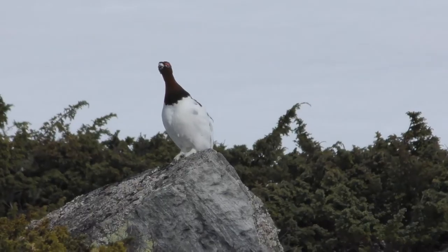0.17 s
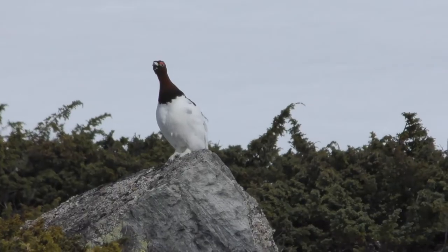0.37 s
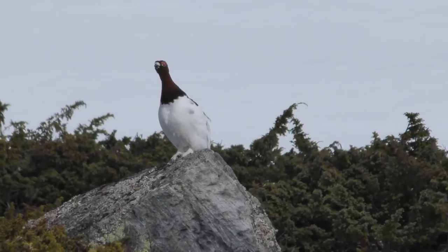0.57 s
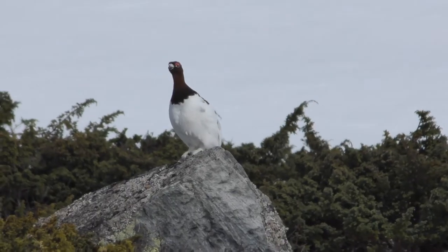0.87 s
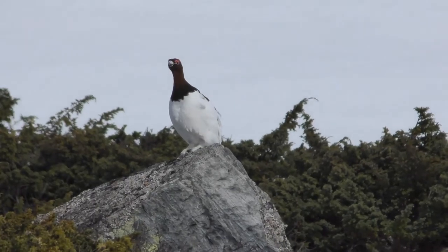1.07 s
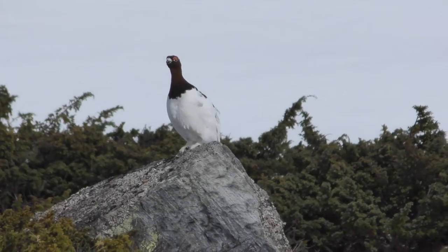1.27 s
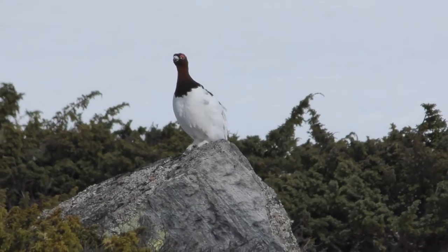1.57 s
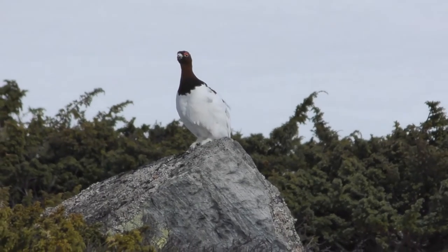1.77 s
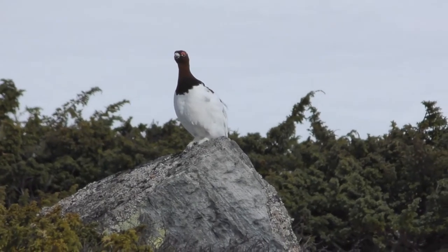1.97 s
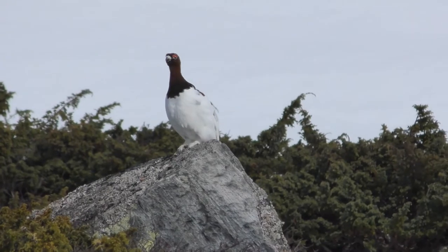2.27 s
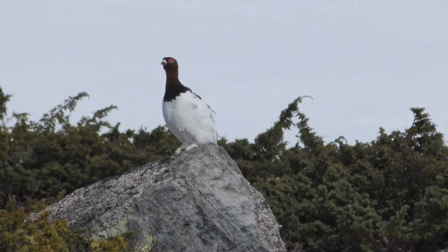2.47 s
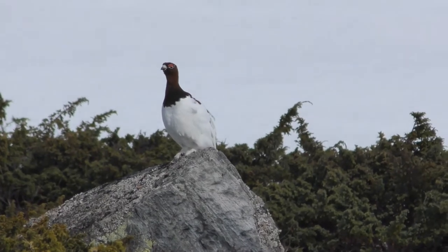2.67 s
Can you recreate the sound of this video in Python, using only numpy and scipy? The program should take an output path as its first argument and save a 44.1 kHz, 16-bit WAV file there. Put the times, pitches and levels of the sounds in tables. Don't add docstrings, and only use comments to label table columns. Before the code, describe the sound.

A grouse ends its rattle from the start to about 0.8 s: thirteen short, dry, nasal croaks, roughly fifteen per second, each a burst of throat clicks, becoming slower, softer and duller, with a short scattered echo. Beneath runs a steady far engine drone in low rumble, soft wind in bushes, faint hiss and barely audible high whine. A tiny plastic tick comes at 1.2 s; only background remains.

```python
import sys
import numpy as np
from scipy import signal
from scipy.fft import rfft, irfft
from scipy.io import wavfile
from scipy.ndimage import uniform_filter1d

SR = 44100
rng = np.random.default_rng(int(sys.argv[2]) if len(sys.argv) > 2 else 0)


def to_wav(s):
    ch = np.atleast_2d(s).T
    pcm = np.round(np.clip(ch, -1, 1) * 32767)
    wavfile.write(sys.argv[1], SR, pcm.astype(np.int16))


def boost_factor(decibels):
    exponent = np.asarray(decibels, float) / 20
    return 10 ** exponent


N = 123921

# f/Hz, likeness/0-1, left minus right/dB, left lead/rad
PORT_SPREAD = [(30, .98, 0, -0.59), (150, 0.93, -1.3, -0.27), (307, 0.94, -1.6, -0.68),
               (590, 0.55, -5.5, -0.51), (1230, 0.76, -6, -0.11), (2620, 0.32, -4, .3),
               (4500, 0.56, -1.5, 0.44), (7000, 0.85, 0.5, -0.072), (15000, 0.6, -0.5, 0)]
# multiple of the cycle/1, rms level/dB
ENGINE_HARMONICS = [(1, -48), (2, -41), (3, -42.5), (4, -56.5), (5, -44.5), (6, -61), (7, -56.5),
                    (8, -46.5), (9, -47.5), (11, -59.5), (12, -57)]
# f/Hz, density/dB per Hz
RUMBLE_COLOUR = [(12, -26), (44, -22), (70, -7), (110, -5), (160, -1), (250, -6.5), (370, -8), (450, -21.5)]
# f/Hz, density/dB per Hz
WIND_COLOUR = [(430, -2), (580, -3.5), (1040, -8), (1370, -5.5), (2390, -18), (3200, -17.5), (3700, -22.5),
               (7000, -37)]
# f/Hz, density/dB per Hz
HISS_COLOUR = [(5000, -21.5), (7700, -3), (10000, 2), (13400, 1.5), (16000, -1.5)]
# t/s, level/dB, first gap/ms, pulse period/ms, beak brightness/dB
CROAKS = [(0.0373, -28.5, 5.1, 3.74, 1), (0.1146, -29, 4.6, 3.88, 0), (.1820, -27, 4.8, 4.0, -0.5),
          (0.2442, -27.5, 5, 4.35, -6.5), (0.3062, -30, 4.6, 4.9, -5.5), (0.359, -32.5, 5.4, 4.7, -2),
          (0.4147, -31, 5.6, 4.95, -3), (0.4735, -31, 5.8, 7.1, -8), (.5222, -33, 6.2, 5.6, -13),
          (0.5759, -32.5, 7.1, 5.1, -6), (.6330, -35, 5.8, 6.1, -1), (.6920, -34.5, 7.1, 5.6, -0.5),
          (0.7686, -37.5, 6.1, 7.0, -16)]
# t/s, level/dB
LEAD_INS = [
    (0.1111, -38),
    (0.3023, -43),
    (0.353, -43),
    (0.4679, -39),
    (0.5651, -45),
    (0.7612, -43),
]
# f/Hz, level/dB, t60/ms
WINDPIPE_MODES = [(1296, -11, 13), (1800, -12, 22), (2126, 4, 13.9), (2591, -3, 18.7), (3350, -16.5, 7.9)]
# f/Hz, level/dB, t60/ms
OPENING_BEAK_MODES = [(3950, -12.5, 6.1), (5650, -18, 9.5), (8470, -18.5, 9.3), (10800, -20, 6)]
# f/Hz, level/dB, t60/ms
OPEN_BEAK_MODES = [(4130, -12.5, 8.8), (6160, -14, 8.5), (8750, -26, 8), (9630, -14.5, 8.5),
                   (10400, -32, 6), (11260, -17, 10.6), (12300, -33, 5.4), (13500, -32, 5)]
# t/s, level/dB, f/Hz, t60/ms, pan/dB
TICKS = [
    (1.2078, -44, 9730, 8, 2),
]

ENGINE_HZ, ENGINE_WANDER_DB, THROB_DB = 27.67, 0.4, 0.8
RUMBLE_DB, WIND_DB, HISS_DB = -35, -46.5, -67.5
WHINE_HZ, WHINE_DB = 15650, -88
CROAK_LENGTH_MS, FAST_PERIOD_MS, LENGTH_POWER = 38, 3.65, 1.6
FADE_DB, FADE_START, SLOWING = 17, 0.17, 0.25
FIRST_PITCH_DROP, FIRST_PULSE_DB = 0.027, -1.5
SAG_PER_S, SAG_PER_DB = 0.05, 0.002
DULLING_DB_PER_DB, LEAD_IN_BEAK_DB = 1.6, -10
BEAK_TOP_HZ = 9500
PUSH_MS = 0.32
PUFF_DB, PUFF_T60_MS = -29, 12
SCATTER_DB, SCATTER_PITCH = 0.7, 0.006
BIRD_PAN_DB, SCRUB_ECHO_DB, SCRUB_T60_S = -1.5, -10.5, 0.076


def read(table, hz, column=1):
    table = np.array(table, float)
    return np.interp(np.log(np.maximum(hz, 1)), np.log(table[:, 0]), table[:, column])


def walk(rate_hz):
    hold = int(SR / rate_hz)
    steps = np.repeat(rng.standard_normal(N // hold + 2), hold)
    smooth = uniform_filter1d(uniform_filter1d(steps, hold), hold)[:N]
    return smooth / smooth.std()


def ports(spectra, hz):
    tilt = boost_factor(read(PORT_SPREAD, hz, column=2) / 2)
    left = tilt * np.exp(0.5j * read(PORT_SPREAD, hz, column=3))
    return spectra * np.array([left, 1 / left])


def coloured_noise(colour, rms_db, slope_db_per_octave):
    hz = np.arange(N // 2 + 1) * SR / N
    low_hz, high_hz = colour[0][0], colour[-1][0]
    octaves_outside = np.log2(np.maximum(low_hz / np.maximum(hz, 1), 1) * np.maximum(hz / high_hz, 1))
    likeness = np.clip(read(PORT_SPREAD, hz), 0, 1)
    mid, side = rfft(rng.standard_normal((2, N)))
    pair = np.sqrt(1 + likeness) * mid + np.sqrt(1 - likeness) * side * np.array([[1], [-1]])
    gain = boost_factor(read(colour, hz) - slope_db_per_octave * octaves_outside)
    noise = irfft(ports(pair * gain, hz), N)
    return noise * boost_factor(rms_db) / noise.std()


def engine_drone():
    t_s, out = np.arange(N) / SR, 0
    starts = rng.uniform(0, 2 * np.pi, len(ENGINE_HARMONICS))
    for (multiple, db), start in zip(ENGINE_HARMONICS, starts):
        hz = ENGINE_HZ * multiple
        level_db = db + ENGINE_WANDER_DB * np.sqrt(multiple) * walk(5)
        tone = np.exp(1j * (2 * np.pi * hz * t_s + start)) * boost_factor(level_db)
        out = out + np.sqrt(2) * ports(tone, np.full(1, hz)).real
    return out


def throb_db():
    return THROB_DB * np.sin(2 * np.pi * ENGINE_HZ * np.arange(N) / SR)


def low_rumble():
    return coloured_noise(RUMBLE_COLOUR, RUMBLE_DB, 32) * boost_factor(0.5 * walk(1.17) + throb_db())


def scrub_wind():
    gusts_db = 0.15 * walk(3.6) + 0.5 * walk(12)
    return coloured_noise(WIND_COLOUR, WIND_DB, 24) * boost_factor(gusts_db + throb_db())


def camera_hiss():
    return coloured_noise(HISS_COLOUR, HISS_DB, 12)


def camera_whine():
    return boost_factor(WHINE_DB) * np.sin(2 * np.pi * WHINE_HZ * np.arange(N) / SR)


def ring_modes(track, t0_s, modes, db, scale):
    i = int(t0_s * SR) + 1
    t_ms = (np.arange(i, i + 1300) / SR - t0_s) * 1000
    push = 1 - np.exp(-t_ms / PUSH_MS)
    for k, (hz, mode_db, t60_ms) in enumerate(modes):
        ring = np.sin(2 * np.pi * hz * scale * t_ms / 1000) * boost_factor(-60 * t_ms / t60_ms)
        track[i:i + len(t_ms)] += (-1) ** k * boost_factor(db + mode_db) * ring * push


def throat_pulses():
    pulses = [(t_s, db, LEAD_IN_BEAK_DB, 0, True) for t_s, db in LEAD_INS]
    for t_s, db, first_gap_ms, period_ms, beak_db in CROAKS:
        length_ms = CROAK_LENGTH_MS * (FAST_PERIOD_MS / period_ms) ** LENGTH_POWER
        ms = 0.0
        while ms < length_ms:
            first = ms == 0
            fade_db = FADE_DB * max(ms / length_ms - FADE_START, 0)
            dulled_db = beak_db - DULLING_DB_PER_DB * fade_db
            pulses.append((t_s + ms / 1000, db - fade_db, dulled_db, fade_db, first))
            ms += first_gap_ms if first else period_ms * (1 + SLOWING * (ms / length_ms) ** 2)
    return pulses


def grouse():
    out = np.zeros(N)
    scatter = rng.standard_normal((200, 3))
    gas = np.diff(rng.standard_normal((200, 601)))
    puff = boost_factor(PUFF_DB - 60 * np.arange(600) / SR * 1000 / PUFF_T60_MS)
    for (t_s, db, beak_db, fade_db, first), chance, breath in zip(throat_pulses(), scatter, gas):
        scale = 1 - SAG_PER_S * t_s + SCATTER_PITCH * chance[0] - SAG_PER_DB * fade_db
        throat_db = db + FIRST_PULSE_DB * first + SCATTER_DB * chance[1]
        ring_modes(out, t_s, WINDPIPE_MODES, throat_db, scale - FIRST_PITCH_DROP * first)
        modes = OPENING_BEAK_MODES if first else OPEN_BEAK_MODES
        beak = [(hz, mode_db + beak_db * hz / BEAK_TOP_HZ, t60_ms) for hz, mode_db, t60_ms in modes]
        ring_modes(out, t_s, beak, db + 2 * SCATTER_DB * chance[2], scale)
        i = int(t_s * SR)
        out[i:i + len(breath)] += boost_factor(db + beak_db) * puff * breath
    return out


def scrub_echo(bird):
    t_s = np.arange(4000) / SR
    tail = rng.standard_normal((2, len(t_s))) * boost_factor(-60 * t_s / SCRUB_T60_S) * (t_s > 0.002)
    tail = tail / np.sqrt((tail ** 2).mean(0).sum())
    return boost_factor(SCRUB_ECHO_DB) * signal.fftconvolve(bird[None], tail)[:, :N]


def camera_tick():
    out = np.zeros((2, N))
    for t_s, db, hz, t60_ms, pan_db in TICKS:
        modes = [(hz, 0, t60_ms), (hz, -5, t60_ms)]
        for ear, sign in zip(out, (1, -1)):
            ring_modes(ear, t_s, modes, db + sign * pan_db / 2, scale=0.97)
    return out


def scene():
    background = engine_drone() + low_rumble() + scrub_wind() + camera_hiss() + camera_whine()
    bird = grouse()
    near = bird * boost_factor(np.array([[0.5], [-0.5]]) * BIRD_PAN_DB)
    return background + near + scrub_echo(bird) + camera_tick()


def top_cut(x):
    return signal.sosfilt(signal.butter(12, 16800, fs=SR, output="sos"), x)


def record(dry):
    low_pass = signal.ellip(10, 0.2, 80, 15850, fs=SR, output="sos")
    mix = signal.sosfilt(low_pass, dry)
    return top_cut(mix)


dry = scene()
out = record(dry)
to_wav(out)
```